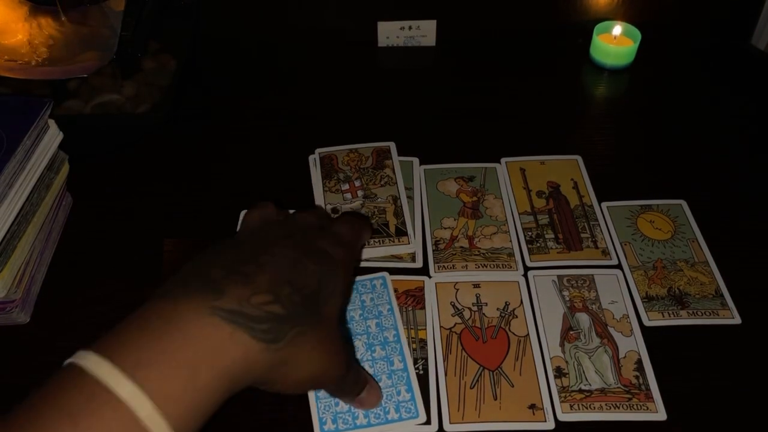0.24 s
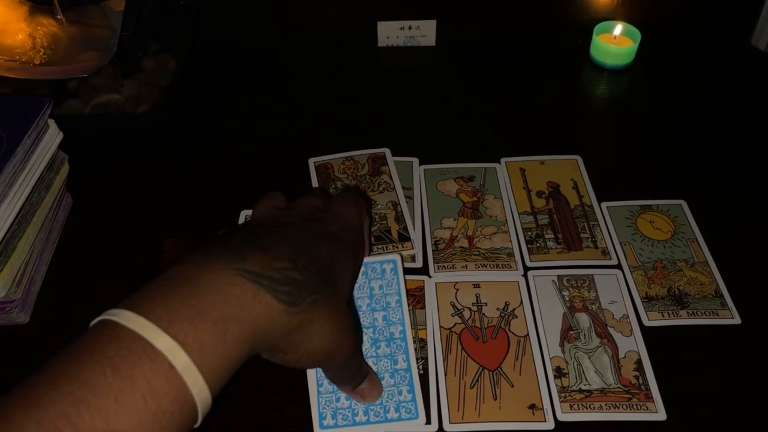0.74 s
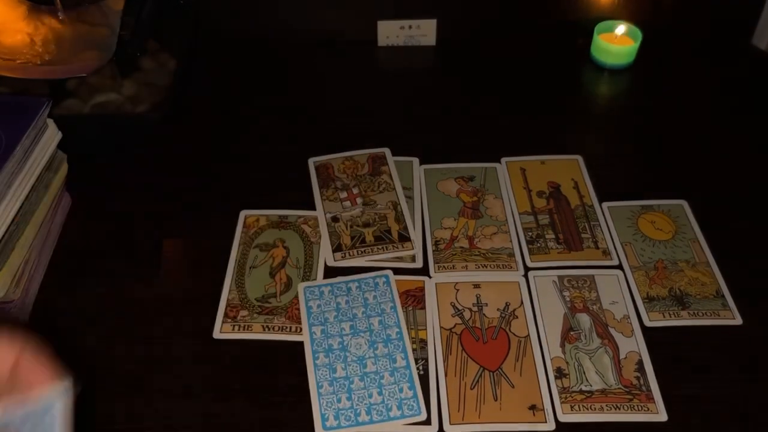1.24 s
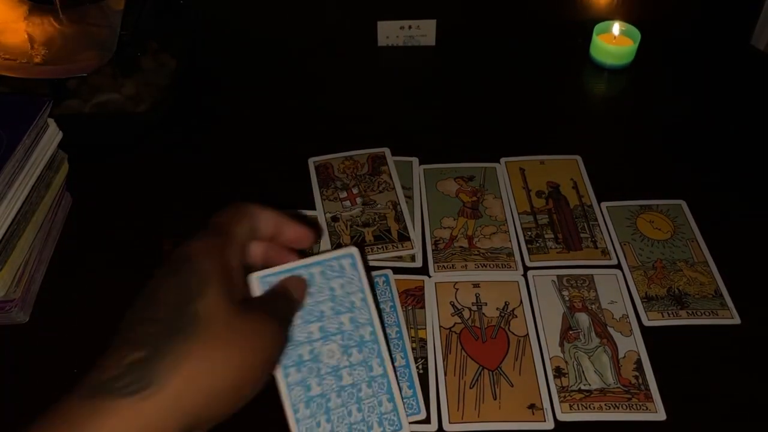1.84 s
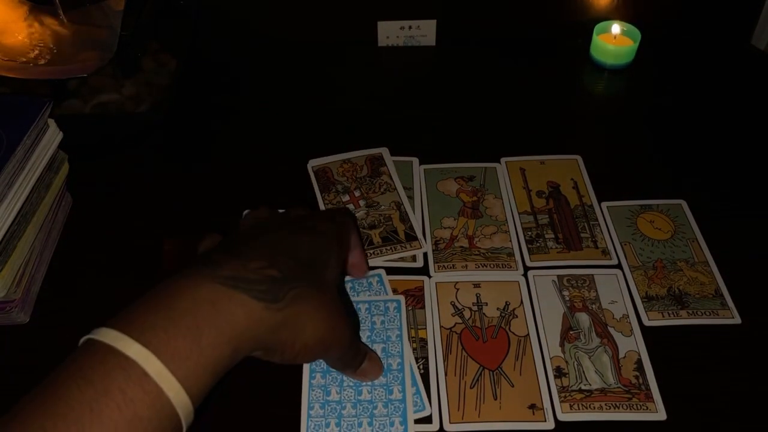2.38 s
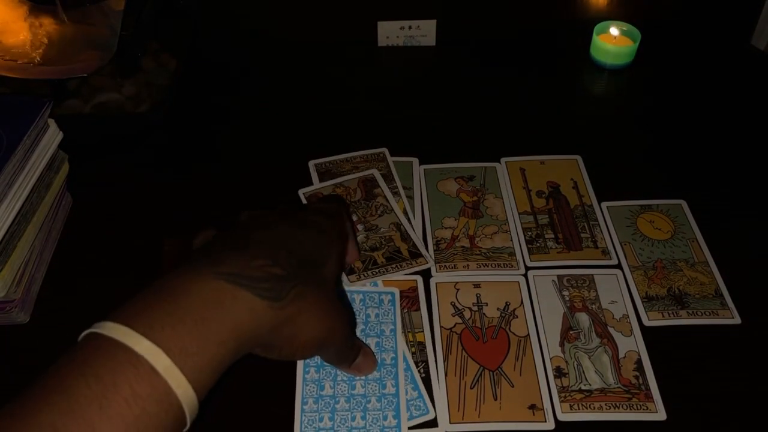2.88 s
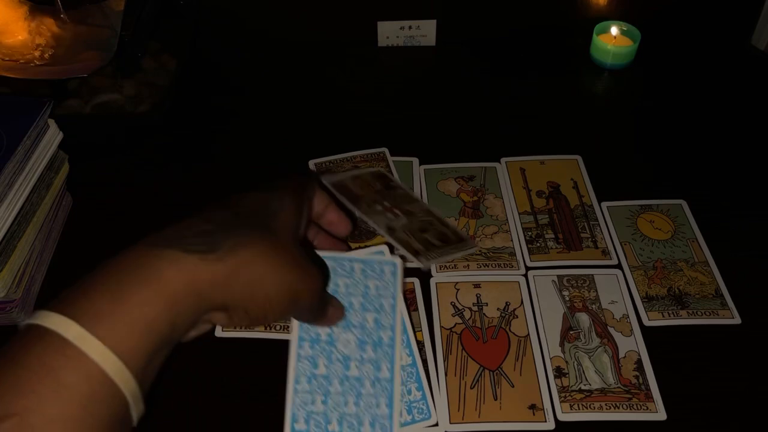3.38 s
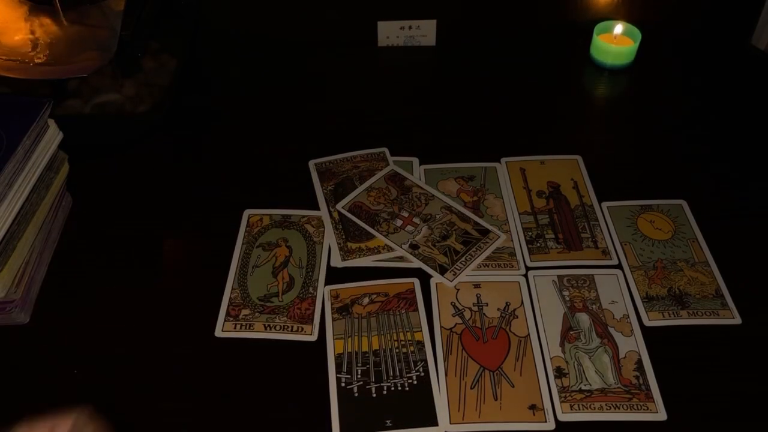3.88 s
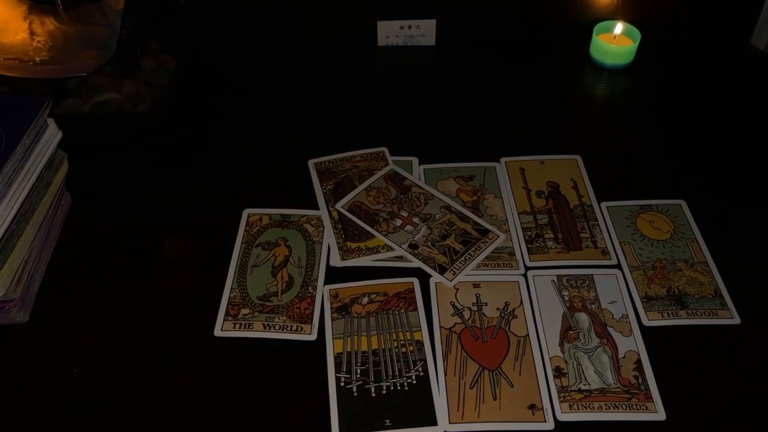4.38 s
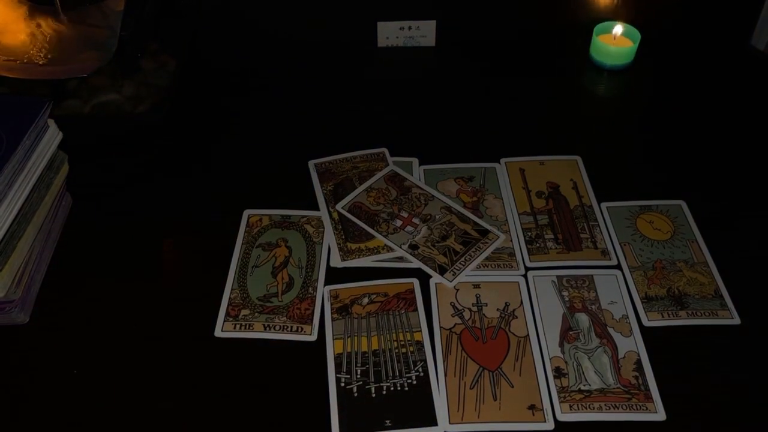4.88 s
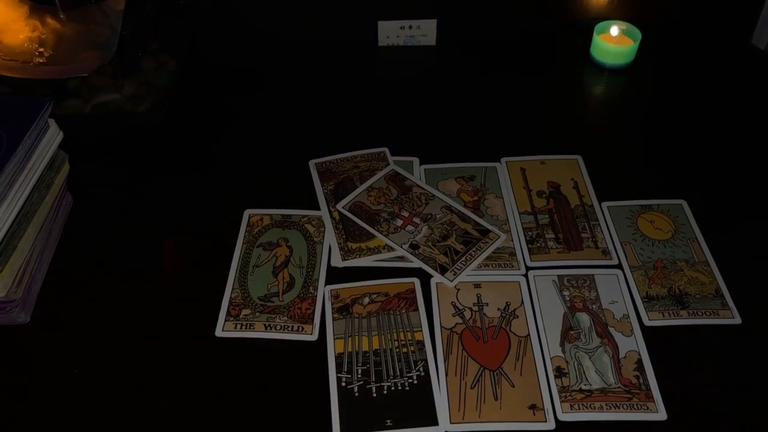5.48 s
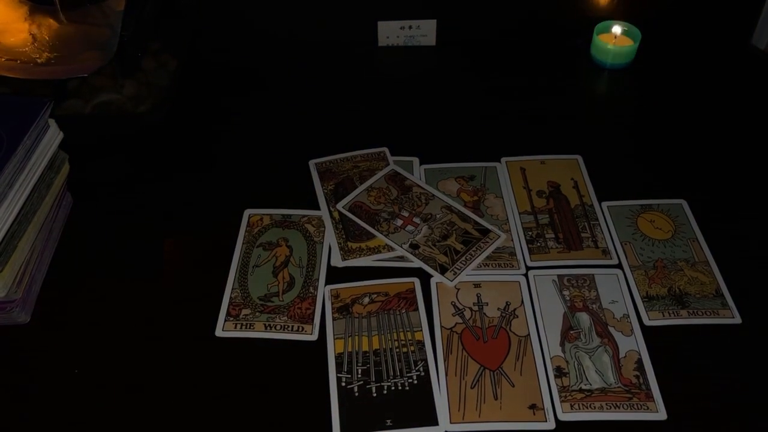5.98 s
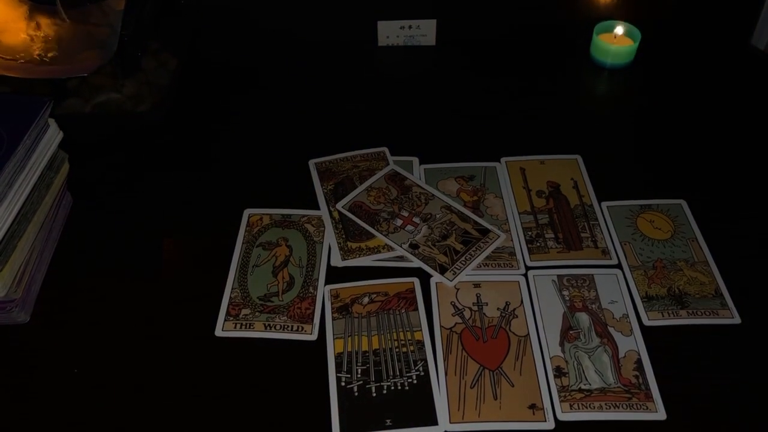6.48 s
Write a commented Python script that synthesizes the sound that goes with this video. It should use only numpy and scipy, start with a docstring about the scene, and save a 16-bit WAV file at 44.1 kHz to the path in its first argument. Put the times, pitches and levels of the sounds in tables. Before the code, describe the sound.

In a quiet humming room, faint card ticks and papery brushes, then a deck clacks down hard on a wooden table and settles.

```python
"""Tarot cards on a wooden table

Tarot cards are dealt and slid about in a quiet room: edges tick as short noise cracks with a ring,
and faces brush as gritty noise. Something hard, likely the deck, is clacked down, settles and bumps
the tabletop: bursts of chatter through resonances, and ringing low modes of the table.
Under it lie a fan-like rumble and air, made of shaped noise, and a mains hum, a pure tone.
Rumble and hum come and go in spells."""
import sys
import numpy as np
from scipy import signal
from scipy.fft import rfft, irfft, next_fast_len
from scipy.io import wavfile

SR = 44100
rng = np.random.default_rng(int(sys.argv[2]) if len(sys.argv) > 2 else 0)


def pcm_store(signal):
    """Save signal as 16-bit PCM."""
    levels = np.round(np.clip(np.atleast_2d(signal), -1, 1) * 32767)
    wavfile.write(sys.argv[1], SR, levels.astype(np.int16).T)


N = 296793
TIME = np.arange(N) / SR   # seconds

# Card edges snapping. Each row: snap time in seconds, drag before it in seconds, time to fall 60 dB
# in seconds, relative crack level in dB, ring pitch in Hz, relative ring level in dB.
TICKS = [(0.81, 0.0011, 0.025, -46, 8670, -34), (1.1225, 0.00071, .024, -40, 4060, -37.5),
         (2.0955, 0.00066, 0.014, -42.5, 4960, -47), (2.365, 0.00068, 0.015, -37.5, 3520, -36),
         (3.1064, 0.0011, 0.01, -28, 2000, -30), (3.108, 0.00103, .014, -41, 4000, -36),
         (3.1147, 0.0013, 0.011, -31.5, 10000, -27), (3.1495, 0.0011, 0.011, -40, 4230, -39),
         (3.264, 0.0026, 0.018, -47.5, 3870, -49), (3.9495, .001, .008, -46, 10600, -40),
         (4.174, 0.0036, .014, -39.5, 2320, -44), (4.211, 0.00097, 0.013, -35.5, 7600, -39.5),
         (4.219, 0.0019, .025, -42, 7600, -54), (4.3138, .002, 0.0064, -33, 10360, -33),
         (4.352, 0.00036, .006, -36, 5300, -44), (4.9095, .0015, 0.025, -46, 5450, -36),
         (4.953, 0.0012, .012, -45, 11000, -38), (5.294, 0.00073, 0.0093, -39, 4770, -34.5),
         (5.301, 0.0017, .01, -55, 6560, -46), (5.402, 0.0021, 0.027, -41, 5400, -44),
         (5.4838, 0.00046, 0.0037, -41, 8440, -27.5), (5.749, 0.003, 0.01, -43, 3700, -50),
         (5.817, 0.00048, 0.017, -33.5, 4590, -35.5), (5.992, 0.00067, 0.0052, -41, 10700, -45),
         (6.027, 0.0024, 0.011, -43, 10720, -26.5), (6.029, 0.0011, 0.0092, -49, 4000, -31),
         (6.0461, 0.00053, 0.0073, -19.5, 1930, -33.5), (6.132, 0.00063, 0.0071, -44, 2680, -41),
         (6.164, 0.0021, 0.015, -36.5, 2920, -37), (6.1725, 0.0009, 0.0082, -27.5, 2850, -31.5),
         (6.221, .0015, 0.019, -41, 3070, -38), (6.2277, 0.0025, 0.0073, -34, 3110, -32.5),
         (6.229, 0.00101, .008, -44, 4000, -36), (6.435, 0.00072, 0.0043, -35, 2750, -32)]
# A snapped card's partials. Each row: multiple of the ring pitch, relative level in dB.
EDGE_PARTIALS = [(.8, -12.5), (1, 1.5), (1.3, -12)]
CRACK_LOW_HZ, CRACK_TOP_HZ = 520, 11500   # the band of the crack
MIDDLE_HZ = 3980        # an edge of middle pitch
TILT_DB = 0             # slope of its crack, in dB per octave
SLOPE_CHANGE_DB = -0.5  # change of the crack's slope for each octave the edge is higher (negative: duller)
RING_Q = 2.8            # ring pitch divided by the width of each rasp filter


def card_ticks(level_db, tone_db, rasp_db):
    """An edge drags, then slips off a finger or another card: a crack, a rasp and a brief ring."""
    t, out = TIME[:SR // 20], np.zeros(N)
    for snap_s, drag_s, t60, crack_db, ring_hz, ring_db in TICKS:
        envelope = swell(t, drag_s, t60)
        # the edge's pitch sets the slope of its crack
        crack = even_crack(envelope, TILT_DB + SLOPE_CHANGE_DB * np.log2(ring_hz / MIDDLE_HZ))

        rasp = rng.standard_normal(len(t))
        for _ in range(2):
            rasp = resonate(rasp, ring_hz, ring_hz / RING_Q)
        rasp = rms_one(rasp)

        tone = sum((-1) ** k * from_db(db) * np.sin(2 * np.pi * ratio * ring_hz * t)
                   for k, (ratio, db) in enumerate(EDGE_PARTIALS))
        ring = envelope * (from_db(tone_db) * tone + from_db(rasp_db) * rasp)

        start = int((snap_s - drag_s) * SR)
        out[start:start + len(t)] += from_db(crack_db) * crack + from_db(ring_db) * ring
    return from_db(level_db) * butter(out, CRACK_TOP_HZ, "low", order=10)


def even_crack(envelope, tilt_db):
    """A noise burst with the same strength at every pitch, but for a slope in dB per octave."""
    size = len(envelope)
    hz = np.maximum(np.arange(size // 2 + 1) * SR / size, CRACK_LOW_HZ)
    # keep only the phase of the noise, and set its strength by pitch
    phase = np.angle(rfft(envelope * rng.standard_normal(size)))
    crack = irfft(np.exp(1j * phase) * from_db(tilt_db * np.log2(hz / MIDDLE_HZ)), size)
    crack = crack * np.linspace(1, 0, size) ** 2
    in_band = butter(crack, (CRACK_LOW_HZ, CRACK_TOP_HZ), "band", order=3)
    return rms_one(in_band) * np.sqrt(np.mean(envelope ** 2))


# Single strokes of card over card. Each row: middle in seconds, length in seconds,
# relative level in dB, scrape pitch in Hz.
SLIDES = [(0.242, 0.028, -55.5, 4500), (0.942, 0.049, -55.5, 5700), (1.14, .018, -59, 4150),
          (1.45, 0.024, -55, 6000), (2.172, .02, -60, 5300), (2.698, .02, -63, 4400),
          (2.803, 0.018, -60, 5400), (3.122, 0.025, -45, 5400), (3.634, 0.03, -58, 5500),
          (3.957, 0.081, -57, 10900), (4.04, 0.04, -57.5, 5500), (4.373, 0.03, -55, 10800),
          (4.909, 0.04, -43.5, 5340), (5.083, 0.013, -55, 6200), (5.159, 0.019, -52.5, 7700),
          (5.417, 0.068, -50.5, 6040), (5.74, 0.027, -53, 3700), (5.911, 0.052, -49.5, 4200),
          (5.972, 0.032, -52.5, 10700), (6.009, .018, -54, 10700), (6.159, 0.022, -51, 10700),
          (6.289, 0.037, -43.5, 3600)]
# Spectrum of card on card. Each row: frequency in Hz, relative level in dB per Hz.
SLIDE_COLOUR = [(1200, -7), (2800, 4.5), (4100, -3.5), (5700, -1.5), (8000, 4), (10500, 13), (11800, -0.5),
                (14000, -48)]
# Light rustling between the strokes, while the cards stay in the hand.
# Each row: start in seconds, end in seconds, relative level in dB.
RUSTLES = [(2.15, 3.27, -88), (4.32, 4.58, -59), (4.93, 5.13, -57), (5.3, 5.55, -56)]


def card_slides(rough_db, grit_db, ring_db, ring_q, flicker_db, shifts_per_s):
    """Strokes of gritty paper on paper swell and fade, each with a pitch; cards shift in between."""
    scrape = grains(rough_db) + from_db(grit_db) * grit(per_s=350, spread_db=7.0)
    friction = rms_one(coloured(scrape, SLIDE_COLOUR))

    # the rustling flickers in level as the grip shifts at random
    grip = np.clip(rng.standard_normal(1000), -2, 2)
    grip_now = np.interp(TIME * shifts_per_s, np.arange(len(grip)), grip)
    out = friction * spells(RUSTLES, rise_s=0.014, t60=0.47) * from_db(flicker_db * grip_now)

    for middle_s, length, db, hz in SLIDES:
        span = abs(TIME - middle_s) < 2 * length
        envelope = np.exp(-(2 * (TIME[span] - middle_s) / length) ** 2)
        stroke = friction[span] * from_db(db) * envelope
        out[span] += stroke + from_db(ring_db) * resonate(stroke, hz, hz / ring_q)
    return out


# The card's own ring when rubbed. Each row: frequency in Hz, width in Hz, relative level in dB.
CARD_MODES = [(2960, 890, -10), (4820, 880, 10.5)]


def card_ring(x):
    """The stiff paper rings a little as it is rubbed."""
    return x + sum(from_db(db) * resonate(x, hz, width) for hz, width, db in CARD_MODES)


# The deck knocks and rebounds on the wood. Each row: start in seconds, contact in seconds,
# relative chatter level in dB, frequency in Hz above which the chatter is dull,
# relative ring level in dB, ring pitch in Hz.
KNOCKS = [(4.632, 0.0057, -18, 3600, -28.5, 2260), (4.64, 0.0077, -11, 6430, -18, 3400),
          (4.657, .002, -32, 6500, -60, 3400), (4.6765, 0.0027, -39, 4500, -52, 3900),
          (4.8256, 0.0077, -31, 2200, -49, 1900), (4.8922, 0.0034, -29, 2900, -50, 3000),
          (4.8976, 0.0053, -25, 2600, -48, 1200), (4.9097, 0.0046, -21.5, 2720, -40.5, 5000),
          (4.9297, 0.0033, -32, 2900, -62, 2500), (4.941, 0.0018, -41, 2900, -64, 1900),
          (5.444, .02, -38, 900, -76, 600), (5.4571, 0.0034, -34, 1300, -70, 1800),
          (6.0467, .0015, -27, 950, -56, 700)]
# Sharp resonances of deck and table, also used by wood_ring.
# Each row: frequency in Hz, relative level in dB, time to fall 60 dB in seconds.
CLACK_MODES = [(624, 8, .13), (1158, 7.5, .06), (1420, -12, 0.18), (1810, 2, 0.11), (1900, -12, .17),
               (2262, 6, 0.043), (2756, -18.5, 0.23), (3028, -10, 0.073), (3400, -0.5, 0.06),
               (3920, 7, 0.028), (4080, -13, .16), (4330, 1, 0.048), (5080, 3.5, 0.064), (5350, 4, 0.041),
               (5800, -6, 0.095), (6340, -4, 0.084), (6680, -10, 0.13)]
# Spectrum of the clacks. Each row: frequency in Hz, relative level in dB per Hz.
CLACK_COLOUR = [(70, 1), (300, 1.5), (700, -6.5), (1200, -3.5), (2300, 0), (3000, 0.5), (4100, 2),
                (6000, 0), (8000, 1), (10500, 5), (11500, -2), (12500, -35), (14000, -55)]
# after each knock the cards chatter on: this long, this much softer, then fall 60 dB in this time
SETTLE_S, SETTLE_DB, SETTLE_T60_S = 0.0098, -26, 0.12
CRACKLE_DB = -0.5   # single card edges slapping, against the dense chatter


def deck_clacks(release_t60, direct_db, body_db, width_hz):
    """The landing deck crackles on the wood, then settles; we hear it directly and via resonances."""
    chatter = grains(rough_db=3.5) + from_db(CRACKLE_DB) * grit(per_s=870, spread_db=3.0)
    force = np.zeros(N)
    for start_s, length, db, dull_hz, *_ in KNOCKS:
        span = slice(int(start_s * SR), int(start_s * SR) + SR // 2)
        landing = burst(start_s, length, release_t60, TIME[span])
        settling = burst(start_s + length, SETTLE_S, SETTLE_T60_S, TIME[span])
        contact = landing + from_db(SETTLE_DB) * settling
        force[span] += from_db(db) * contact * rms_one(butter(chatter[span], dull_hz, "low", order=3))
    body = sum(from_db(db) * resonate(force, hz, width_hz) for hz, db, _ in CLACK_MODES)
    return coloured(from_db(direct_db) * force + from_db(body_db) * body, CLACK_COLOUR)


def wood_ring(falloff_db):
    """Each clack pumps the sharp modes for as long as it lasts, favouring those near its own pitch."""
    return sum(strike(start_s, length, CLACK_MODES,
                      lambda hz: db - falloff_db * abs(np.log2(hz / pitch)))   # falloff per octave
               for start_s, length, _, _, db, pitch in KNOCKS)


# Blows to the tabletop. Each row: start in seconds, build-up in seconds, relative level in dB,
# favoured pitch in Hz, multiplier of the modes' ring times.
THUDS = [(4.6337, 0.017, -13.4, 265, 1.36), (4.6418, .0179, -3.5, 509, 0.91),
         (4.8294, 0.0055, -18.5, 256, 0.77), (4.8913, 0.015, -5.5, 294, 0.29),
         (4.9061, 0.0075, -8.9, 389, 1.13), (4.941, .013, -17.5, 52, 0.64),
         (5.4237, 0.022, -22.5, 300, .67), (5.4459, 0.0083, -12, 204, .4), (5.454, .005, -25.5, 442, 0.91),
         (5.468, 0.0061, -21.5, 232, .79), (6.047, .003, -36, 495, .4)]
# The tabletop's low modes. Each row: frequency in Hz, relative level in dB,
# time to fall 60 dB in seconds, before that multiplier.
TABLE_MODES = [(51, 1.5, 0.28), (133, 2, 0.094), (181, -5, 0.23), (226, -3.5, 0.11), (255.7, -2.5, 0.16),
               (325, -3.5, 0.04), (366, -11.5, 0.084), (461.5, 1.5, 0.083), (530, -16.5, 0.13)]


def table_thuds(falloff_db):
    """Bending waves build up in the tabletop, favouring modes near the blow's pitch; a hand damps some."""
    return sum(strike(start_s, build_s, TABLE_MODES,
                      lambda hz: db - falloff_db * abs(np.log2(hz / pitch)), share)
               for start_s, build_s, db, pitch, share in THUDS)


# Spells of the rumble. Each row: start in seconds, end in seconds, level in dB.
RUMBLE_SPELLS = [(0, .25, -36.5), (.17, 4.62, -32.8), (4.83, 5.14, -33.2), (6.41, 6.5, -36.5)]
# Spells of the mains hum. Each row: start in seconds, end in seconds, rms level in dB.
HUM_SPELLS = [(0, 5.14, -34), (6.07, 6.42, -33)]
# Spectra of the rumble and of the moving air.
# Each row: frequency in Hz, relative level in dB per Hz.
RUMBLE_COLOUR = [(30, -6), (60, -6.5), (95, 0), (112, -2.5), (138, 3), (175, -6.5), (225, 1), (300, -4.5),
                 (460, -7.5), (600, -19.5), (900, -20), (1600, -45.5), (4000, -82)]
AIR_COLOUR = [(25, -18), (60, -3), (140, 3.5), (280, -4), (500, -4.5), (620, -10.5), (860, -8),
              (1020, -11.5), (1500, -11), (2800, -19.5), (5000, -25.5), (7500, -28), (10700, -28),
              (11800, -54.5), (13000, -79)]
HUM_HZ = 49.9
RUMBLE_REST_DB, HUM_REST_DB = -47.5, -45   # what stays between the spells
AIR_DB = -42   # steady throughout


def drone():
    """Steady air, with a rumble and a pure mains hum that sink to a low rest between their spells."""
    hum_gain = np.maximum(spells(HUM_SPELLS, rise_s=0.035, t60=0.22), from_db(HUM_REST_DB))
    rumble_gain = np.maximum(spells(RUMBLE_SPELLS, rise_s=0.021, t60=0.84), from_db(RUMBLE_REST_DB))
    hum = np.sqrt(2) * hum_gain * np.sin(2 * np.pi * HUM_HZ * TIME)
    rumble = rumble_gain * diffuse(RUMBLE_COLOUR)
    air = from_db(AIR_DB) * diffuse(AIR_COLOUR)
    return hum + rumble + air


# How wide the diffuse sound is. Each row: frequency in Hz, side level minus mid level in dB.
SPREAD = [(100, -50), (300, -18.5), (700, -3.5), (1300, -5.5), (2500, -32), (10000, -50)]


def diffuse(colour):
    """Steady noise from all round the room, slightly different at each microphone port."""
    mid, side = rng.standard_normal((2, N))
    both_ports = mid + coloured(side, SPREAD) * [[1], [-1]]
    return rms_one(coloured(both_ports, colour))


def room(x, t60, wet_db, dull_hz):
    """The direct sound plus a short diffuse tail from the walls."""
    t = TIME[:SR // 2]
    echoes = butter(rng.standard_normal(len(t)), dull_hz, "low", order=1)
    tail = echoes * from_db(-60 * t / t60) * (t > .004)   # starts after 4 ms
    tail = tail / np.sqrt(np.sum(tail ** 2))
    return x + from_db(wet_db) * signal.fftconvolve(x, tail)[:N]


def strike(start, rise_s, modes, weight_db, ring_share=1):
    """One blow sets a table of modes ringing; weight_db(Hz) tells how well it reaches each."""
    t, out = TIME[:SR // 2], np.zeros(N)
    ring = 0
    for k, (hz, db, t60) in enumerate(modes):
        gain = (-1) ** k * from_db(db + weight_db(hz))
        ring = ring + gain * swell(t, rise_s, t60 * ring_share) * np.sin(2 * np.pi * hz * t)
    out[int(start * SR):int(start * SR) + len(t)] = ring
    return out


def grains(rough_db):
    """Paper fibres catching: noise whose strength heads for a new value about every millisecond."""
    steps = rng.standard_normal(N // 40 + 2)
    catch = np.interp(np.linspace(0, len(steps) - 1, N), np.arange(len(steps)), steps)
    return rms_one(rng.standard_normal(N) * from_db(rough_db * np.clip(catch, -2, 2)))


def grit(per_s, spread_db):
    """Separate snags of uneven size at random moments."""
    sizes = from_db(spread_db * np.minimum(rng.exponential(1, N), 3)) * rng.choice([-1, 1], N)
    return rms_one(sizes * (rng.random(N) < per_s / SR))


def swell(t, rise_s, t60):
    """A vibration builds up, then dies away by 60 dB in t60 seconds."""
    return np.minimum(t / rise_s, 1) * from_db(-60 * np.maximum(t - rise_s, 0) / t60)


def burst(start, length, t60, t=TIME):
    """Envelope of a contact: holds for its length, then dies by 60 dB in t60 seconds."""
    return (t >= start) * from_db(-60 * np.clip((t - start - length) / t60, 0, 3))


def spells(rows, rise_s, t60):
    """Envelope of sounds that rise, hold and die away; where spells overlap the louder one counts."""
    return np.max([from_db(db) * np.clip((TIME - start) / rise_s, 0, 1) * burst(start, end - start, t60)
                   for start, end, db in rows], axis=0)


def resonate(x, hz, width):
    """A resonance with gain 1 on top."""
    r = np.exp(-np.pi * width / SR)
    feed = np.array([1, 0, -1]) * (1 - r * r) / 2
    feedback = [1, -2 * r * np.cos(2 * np.pi * hz / SR), r * r]
    return signal.lfilter(feed, feedback, x + 1e-18)


def butter(x, hz, kind, order=2):
    """A Butterworth filter that only looks back in time."""
    edge_hz = np.minimum(hz, SR / 2 - 1000)
    return signal.sosfilt(signal.butter(order, edge_hz, kind, fs=SR, output="sos"), x + 1e-18)


def coloured(x, colour):
    """Give a sound a spectrum."""
    return filtered(x, lambda hz: from_db(at_hz(colour, hz)))


def filtered(x, response):
    """Apply a frequency response, given as a function of Hz."""
    size = next_fast_len(N + SR // 4, True)
    hz = np.maximum(np.arange(size // 2 + 1) * SR / size, 1)
    return irfft(rfft(x, size) * response(hz), size)[..., :N]


def at_hz(points, hz):
    """Read a curve on a log-frequency axis."""
    points = np.array(points)
    return np.interp(np.log(hz), np.log(points[:, 0]), points[:, 1])


def from_db(db):
    """Decibels to gain."""
    return 10 ** (np.asarray(db) / 20)


def rms_one(x):
    """Scale to unit rms."""
    return x / np.sqrt(np.mean(x ** 2) + 1e-20)


def scene():
    """Cards and knocks in the small room, over its drone."""
    slides = card_slides(rough_db=1.5, grit_db=-4.0, ring_db=2.5, ring_q=4.1, flicker_db=3, shifts_per_s=25)
    ticks = card_ticks(level_db=3.5, tone_db=-3, rasp_db=-2.5)
    cards = room(ticks + card_ring(slides), t60=0.19, wet_db=-15, dull_hz=7100)
    clacks = deck_clacks(release_t60=0.012, direct_db=-4.0, body_db=-8, width_hz=130)
    clacks = room(clacks, t60=0.17, wet_db=-13, dull_hz=6000)
    wood = wood_ring(falloff_db=7.5) + table_thuds(falloff_db=25.5)
    return cards + clacks + wood + drone()


# Phase between the two microphone ports. Each row: frequency in Hz, lead of the left in radians.
PORT_PHASE = [(20, 0), (600, 0), (1100, -.8), (1800, 0), (2600, .7), (4000, .8), (4600, 1.6), (5200, 4.8),
              (5800, 6.2), (8800, 9.3), (10500, 10.7), (12000, 12.5)]
# Level between the ports. Each row: frequency in Hz, left minus right in dB.
PORT_BALANCE = [(300, 0), (700, -2), (1300, 2.5), (2500, 0), (5000, 0), (9000, 3.5)]
CUTOFF_HZ = 14200


def record(dry):
    """Two ports differ in phase and level; deep bass and top are cut, and peaks are softly rounded."""
    left = filtered(dry[0], lambda hz: from_db(at_hz(PORT_BALANCE, hz) / 2))
    right = filtered(dry[1], lambda hz: from_db(-at_hz(PORT_BALANCE, hz) / 2)
                     * np.exp(-1j * at_hz(PORT_PHASE, hz)))
    rounded = np.tanh(butter(np.array([left, right]), 34.0, "high", order=4))
    top_cut = signal.ellip(10, .1, 80, CUTOFF_HZ, fs=SR, output="sos")
    return signal.sosfilt(top_cut, rounded)


dry = scene()
out = record(dry)
pcm_store(out)
```